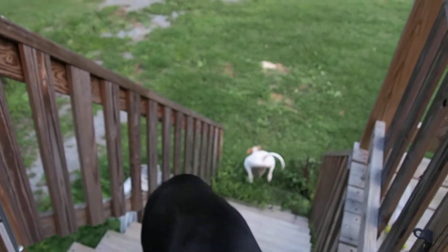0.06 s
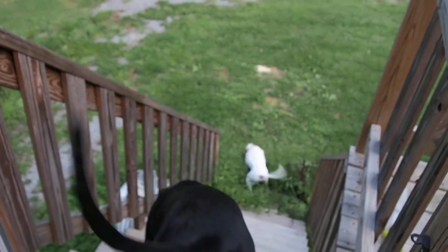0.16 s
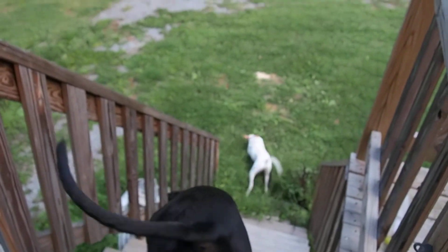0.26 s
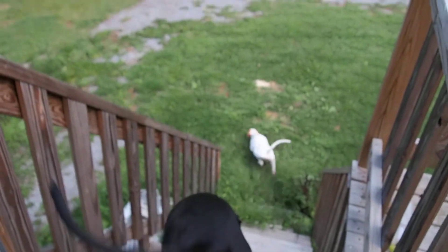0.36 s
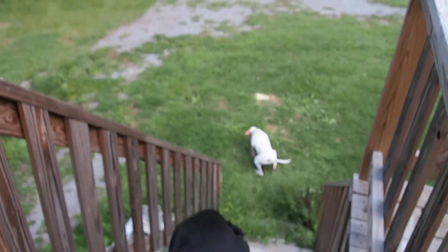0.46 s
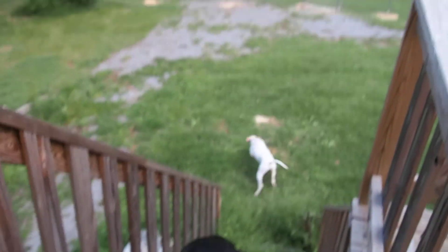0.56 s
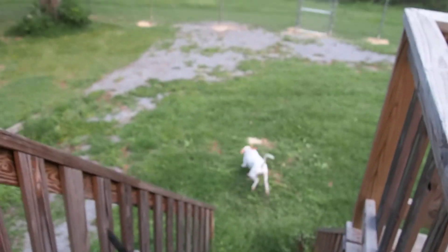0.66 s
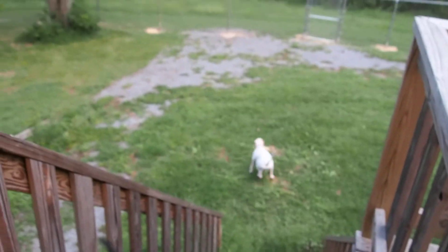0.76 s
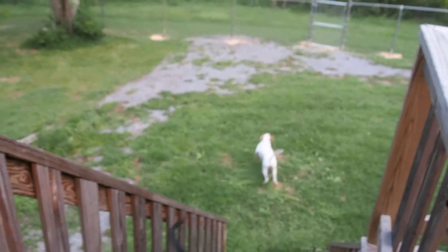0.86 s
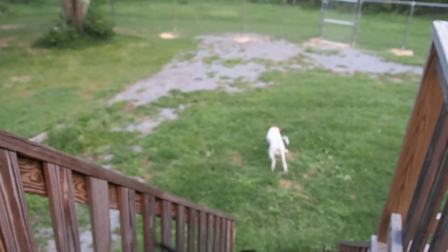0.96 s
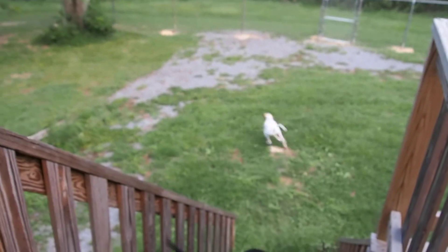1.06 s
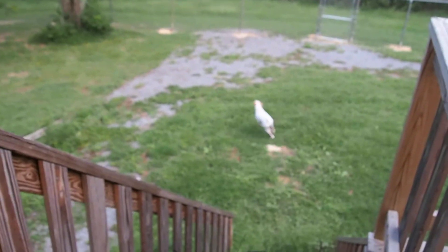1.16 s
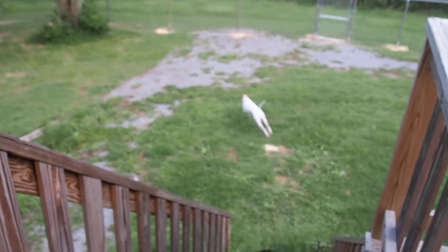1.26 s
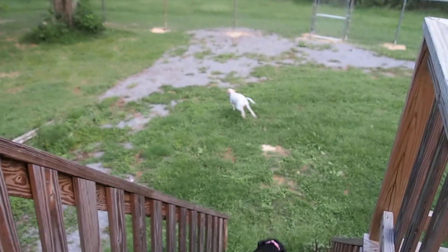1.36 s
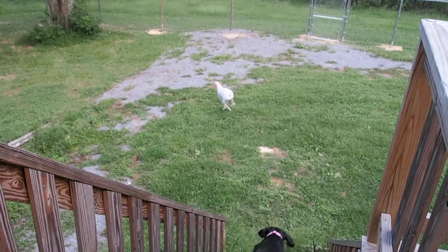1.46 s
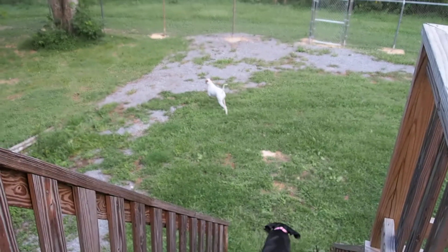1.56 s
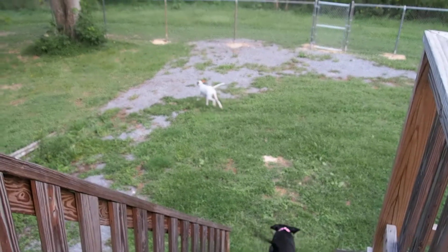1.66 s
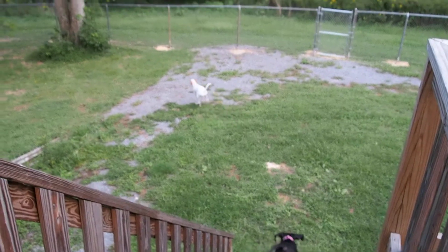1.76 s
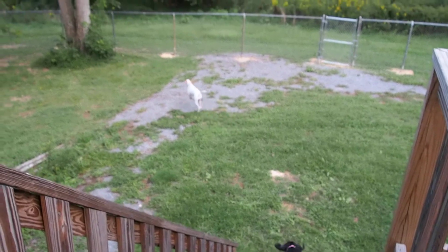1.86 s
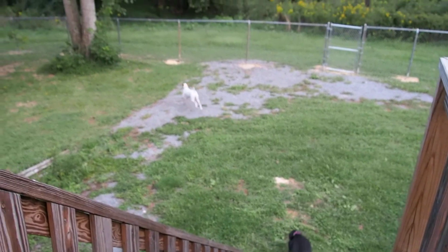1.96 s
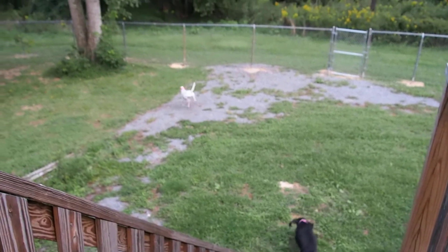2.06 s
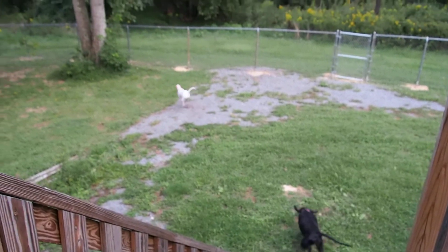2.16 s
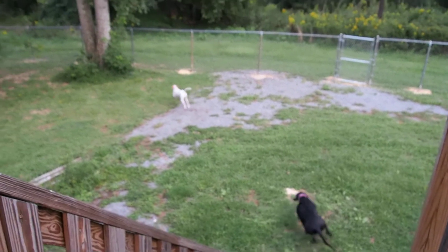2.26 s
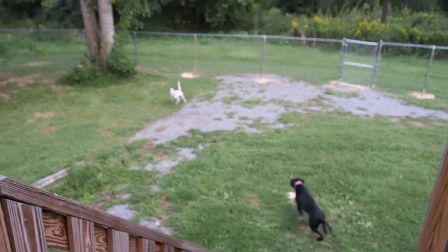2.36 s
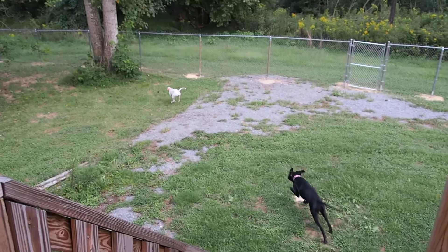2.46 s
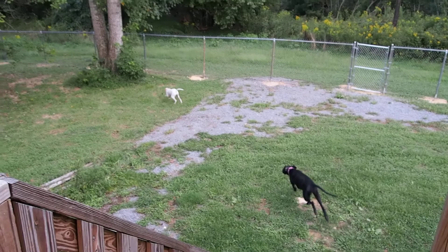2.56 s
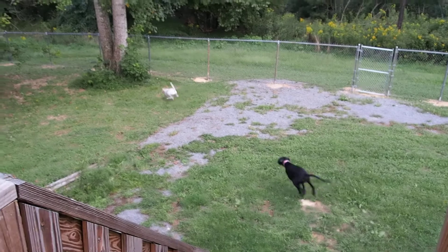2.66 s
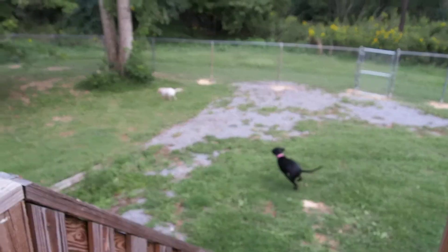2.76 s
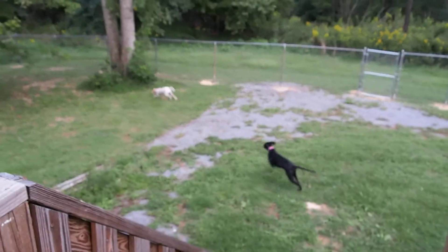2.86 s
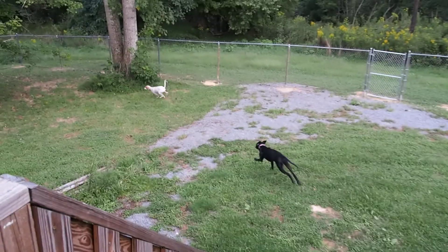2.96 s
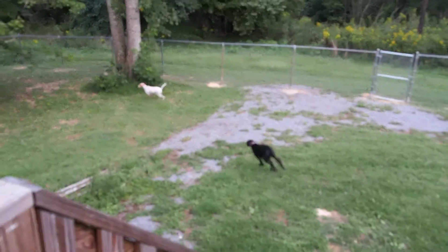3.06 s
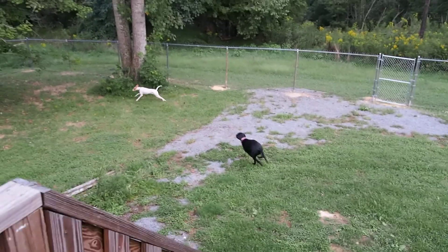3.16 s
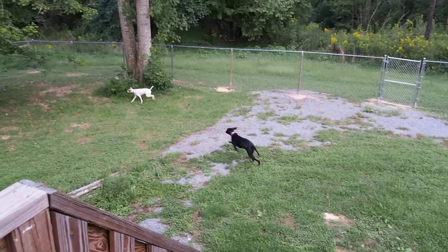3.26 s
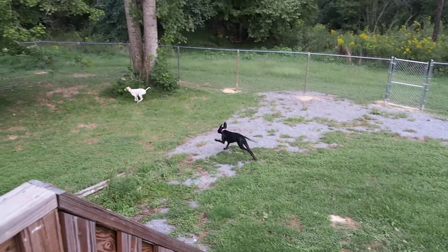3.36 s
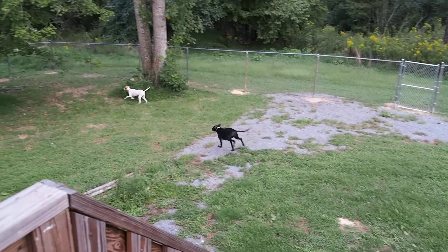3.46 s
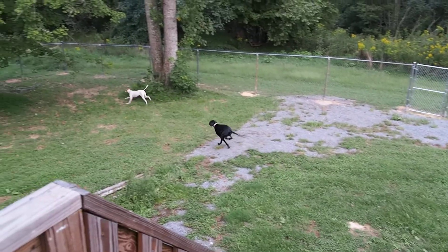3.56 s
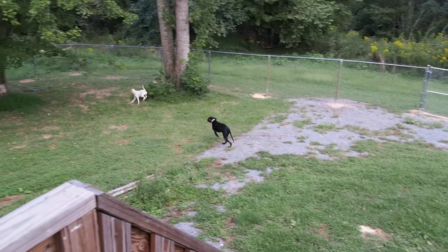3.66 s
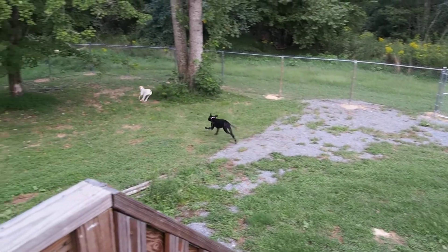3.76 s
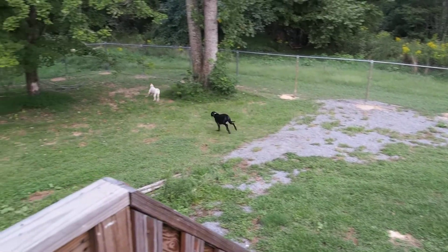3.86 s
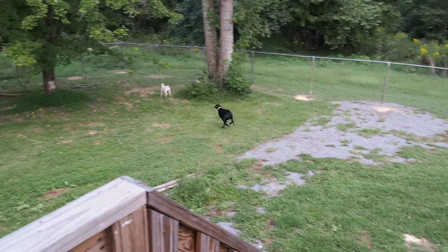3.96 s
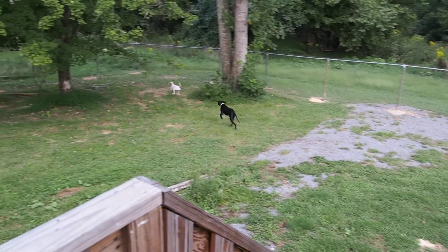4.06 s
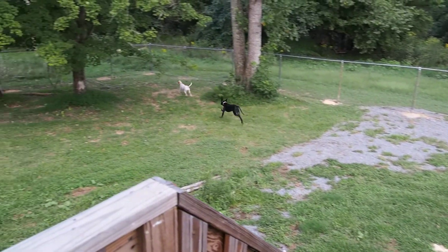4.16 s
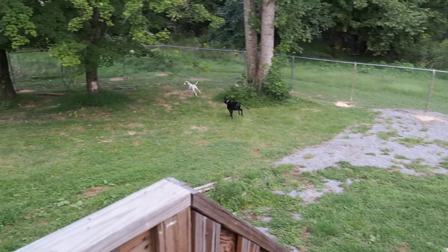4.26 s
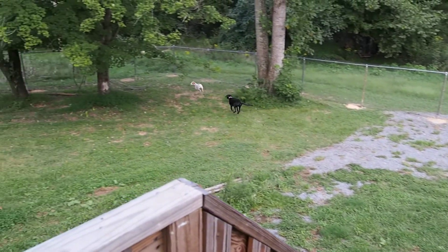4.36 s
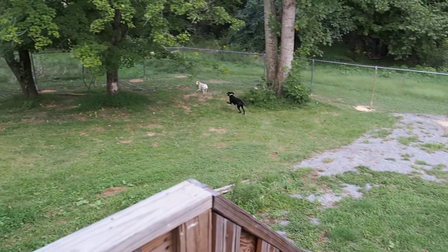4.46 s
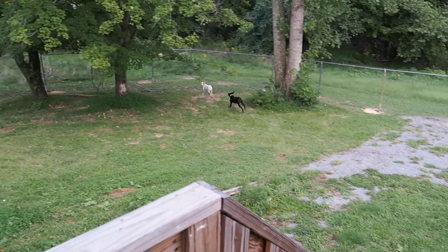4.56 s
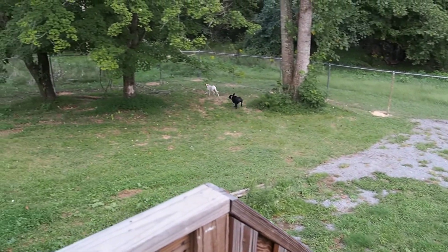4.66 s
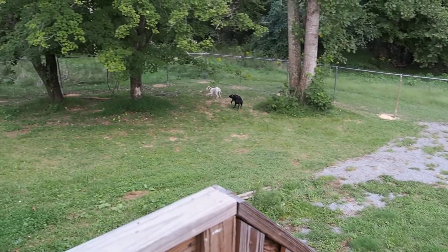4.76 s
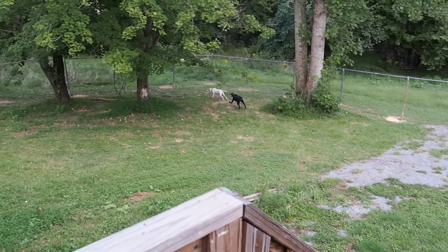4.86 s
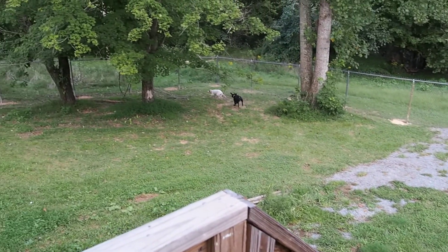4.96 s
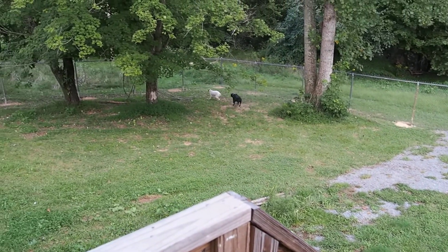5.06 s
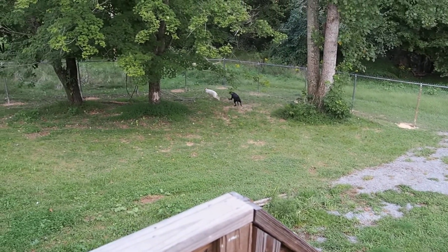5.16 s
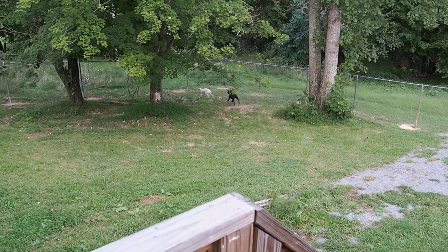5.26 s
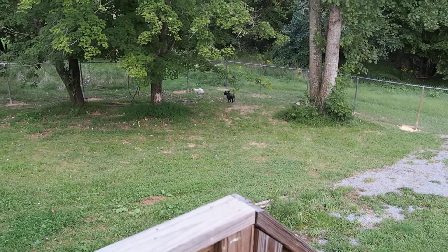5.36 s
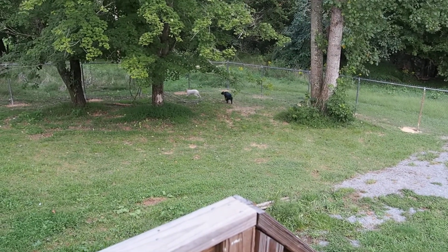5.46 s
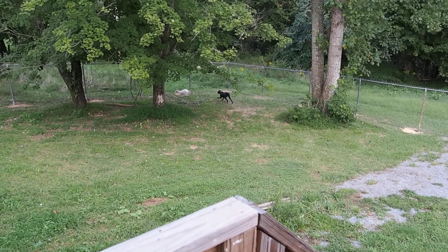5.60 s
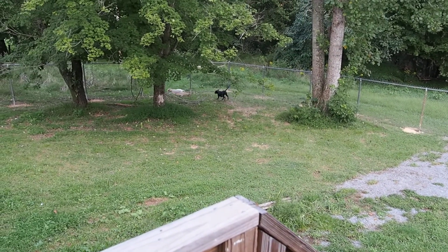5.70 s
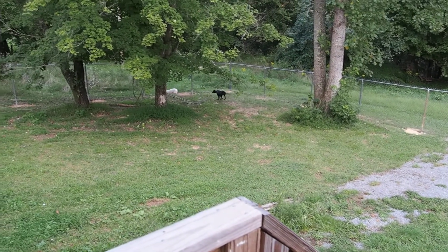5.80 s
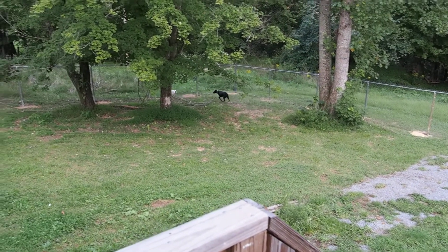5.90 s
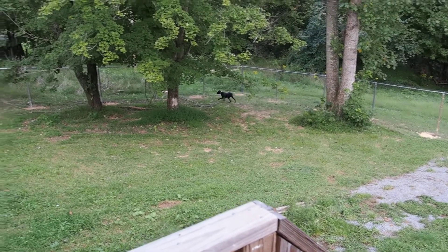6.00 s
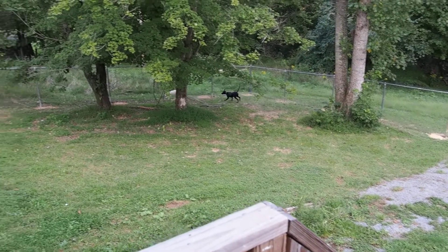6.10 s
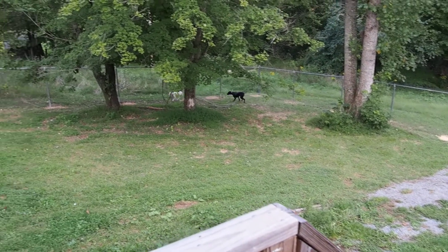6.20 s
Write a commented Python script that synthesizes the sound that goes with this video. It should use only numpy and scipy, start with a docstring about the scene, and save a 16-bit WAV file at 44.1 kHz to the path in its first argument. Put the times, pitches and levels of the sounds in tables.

```python
"""A back yard: a big dog scrambles down wooden deck steps and gallops off over the lawn, growling hoarsely.
Soft pads set the treads ringing and loose boards rumbling; claws snap and scrape on the wood.
Out on the grass the paws swish and thump, and each growl is uneven pulses and breath ringing the throat.
Behind it all, insect wings click into a high drone over a faint hum and the hush of traffic and leaves."""
import sys
import numpy as np
from scipy import signal
from scipy.fft import rfft, irfft
from scipy.io import wavfile
from scipy.ndimage import uniform_filter1d

SR = 44100
rng = np.random.default_rng(int(sys.argv[2]) if len(sys.argv) > 2 else 0)


def inscribe(sig):
    """Save sig as 16-bit PCM at rate SR to the path in sys.argv[1].

    A 1-D sig is mono; a 2-D sig holds one channel per row.
    Samples are clipped to [-1, 1] before scaling.
    """
    pcm = np.round(np.clip(np.atleast_2d(sig).T, -1, 1) * 32767)
    wavfile.write(sys.argv[1], SR, pcm.astype(np.int16))


N = 274902

# pads landing on the steps: (time [s], blow [dB], board pitch [Hz], t60 [s])
PAD_LANDINGS = [(0.0, -10.5, 345, 0.072), (0.009, -15.5, 335, 0.023), (0.033, -26, 330, 0.06),
                (0.078, -19.5, 374, 0.071), (0.1, -9, 350, 0.018), (0.117, -17.5, 329, 0.041),
                (0.249, -25, 249, 0.038), (0.301, -20, 289.4, 0.073), (0.359, -21, 266, 0.056),
                (0.41, -29, 287, 0.066), (0.509, -32.5, 342, 0.17), (0.608, -25, 297, 0.098),
                (0.752, -31, 255, 0.076), (0.855, -12.5, 322, 0.06), (0.899, -21.5, 350, 0.03),
                (0.972, -38, 320, 0.04), (0.985, -26, 303, 0.03), (1.013, -8, 401, 0.043),
                (1.034, -18, 396, 0.023), (1.047, -29, 380, 0.06), (1.072, -19.5, 312, 0.065),
                (1.092, -9, 311, 0.035), (1.115, -14, 275, 0.058), (1.139, -15, 360, 0.016),
                (1.178, -12, 381, 0.039), (1.198, -14.5, 458.5, 0.11), (1.261, -15.5, 400, 0.053),
                (1.298, -24, 516, 0.046), (1.33, -20, 540, 0.0078), (1.38, -27, 416, 0.24),
                (1.405, -17.5, 319.5, 0.074), (1.428, -20, 313, 0.032), (1.53, -23, 431, 0.035),
                (1.543, -20, 474, 0.021), (1.763, -30, 239, 0.059), (1.896, -29.5, 236, 0.011),
                (2.027, -16.5, 539, 0.017), (2.071, -24, 324, 0.014)]
# modes of a board: (pitch [ratio], level [dB], t60 [ratio])
BOARD_MODES = [(1.002, 12, 1.31), (1.347, 3.5, 1.2), (.45, -19, 0.23), (2.3, -3.5, 0.56), (2.9, -5.5, 0.29),
               (4.2, -10, 0.29)]
# modes of the stringers and rails under every tread: (pitch [Hz], level [dB], t60 [s])
FRAME_MODES = [(105.6, -17.5, 0.14), (151, -18.5, 0.08), (207, -8, 0.098), (651, 0, 0.23), (933, 2, 0.15)]
# colour of a brushing paw, before tilt: (frequency [Hz], level [dB])
SWISH_SPECTRUM = [(470, -16.5), (800, 23), (953, 21), (2630, 5.5), (3300, 9.5), (4990, 0.5), (6910, -3.5),
                  (9220, -9), (10800, -24), (16000, -25.5)]


def pad_knocks():
    """A soft pad lands; the ring of tread and frame builds up, then dies in short modes."""
    out, t = np.zeros(N), np.arange(9000) / SR
    rise_s = 0.0085
    attack, decay_time = np.sin(np.pi / 2 * np.minimum(t / rise_s, 1)) ** 2, np.maximum(t - rise_s, 0)
    frame = sum(ping(t, hz, db, t60) for hz, db, t60 in FRAME_MODES[:3])
    # the pad starts the high frame modes less and damps them
    frame += sum(ping(t, hz, db - 9, t60 / 2.16) for hz, db, t60 in FRAME_MODES[3:])
    frame *= np.minimum(t / 0.027, 1)
    for start, db, hz, t60 in PAD_LANDINGS:
        ring = np.zeros(len(t))
        for ratio, mode_db, t60_ratio in BOARD_MODES:
            envelope = attack * amp(mode_db - 60 * decay_time / (t60 * t60_ratio))
            ring += envelope * np.sin(2 * np.pi * (hz * ratio * t + rng.random()))
        add(out, start - .002, amp(db) * (ring / abs(ring).max() + frame))
    return out


def board_rumble():
    """Loose boards rattle: each blow adds energy that builds up and dies away."""
    jolts = rng.standard_normal(N) * amp(1.9 * wobble(rng.standard_normal(N), 500))
    rattle = sum(amp(db) * band(jolts, 300 * ratio, 194) for ratio, db, _ in BOARD_MODES)
    rattle += sum(amp(db + 2.5) * band(jolts, hz, 140) for hz, db, _ in FRAME_MODES)
    power, t = np.zeros(N), np.arange(SR) / SR
    rise_s, t60, blow_share = 0.0031, 0.34, 0.59
    swell = np.minimum(t / rise_s, 1) * amp(-60 * t / t60)
    for start, blow_db, _, _ in PAD_LANDINGS:
        add(power, start, (amp(-30.5 + blow_share * (blow_db + 15.5)) * swell) ** 2)
    return evened(rattle) * np.sqrt(power)


def claws():
    """A nail bites with a snap that rings the spot and the plank, then slides in a gritty scrape."""
    # nails catching wood or gravel: (time [s], level [dB], ring of the spot [Hz], scrape t60 [s])
    catches = [(0.014, -14, 3340, 0.13), (0.046, -19.5, 3850, 0.19), (0.0526, -20, 4250, 0.12),
               (0.08, -34, 3100, 0.043), (0.106, -24.5, 3830, 0.037), (0.117, -21, 2900, 0.046),
               (0.124, -22.5, 3040, 0.06), (0.248, -23.5, 2940, 0.02), (0.3001, -12.5, 4720, 0.038),
               (0.378, -27, 4300, 0.092), (0.508, -19.5, 4460, 0.051), (0.5208, -21, 2280, 0.064),
               (0.567, -27, 3230, 0.05), (0.7994, -24.5, 3100, 0.063), (0.862, -25, 4400, 0.084),
               (0.984, -20, 3470, 0.11), (0.996, -23.5, 1770, 0.097), (1.1197, -14.5, 2460, 0.1),
               (1.123, -15, 3770, 0.026), (1.1855, -19, 4450, 0.033), (1.1856, -16, 5900, 0.034),
               (1.236, -32, 3720, 0.03), (1.246, -33.5, 3870, 0.67), (1.4077, -34, 2660, 0.096),
               (1.5452, -27, 1250, 0.03), (1.763, -29.5, 3970, 0.17), (2.0068, -28.5, 3660, 0.54),
               (2.0274, -27, 4370, 0.064), (2.069, -34.5, 3020, 0.45), (2.15, -43, 3350, 0.02),
               (2.2303, -24, 3500, 0.061), (2.262, -34, 2680, 0.062), (3.971, -33.5, 3300, 0.035),
               (4.855, -30, 3060, 0.011), (5.011, -38, 3100, .012), (5.043, -28.5, 1880, 0.21),
               (5.055, -22, 3820, 0.18)]
    # colour of a bite, before shift and tilt: (frequency [Hz], level [dB])
    bite_spectrum = [(500, -8), (850, -11), (1480, 0), (3200, 4), (5230, -1.5), (8500, -6.5), (11000, -25),
                     (16000, -28)]
    # plank modes a nail excites: (pitch [Hz], level [dB])
    plank_modes = [(980, -9.5), (1465, -9), (1720, -10.5), (2180, -11), (2800, -11), (3270, -5),
                   (4500, -13)]
    out, t = np.zeros(N), np.arange(5000) / SR
    noises = rng.standard_normal((len(catches), 2, len(t)))
    tunings = 1 + 0.0374 * rng.standard_normal((len(catches), len(plank_modes)))
    for (start, db, hz, t60), (grit, grip), tuning in zip(catches, noises, tunings):
        bite = np.sign(grit) * amp(-60 * t / 0.0066)
        bite[0] = 6  # snap of the first contact
        hardness = min(1, (0.053 / t60) ** 0.31)  # a nail that slides long bites less
        scrape = grit * amp(-10.5 + 3.5 * wobble(grip, 50) - 60 * t / t60) * np.minimum(t / .0014, 1)
        drive = hardness * bite + scrape
        spectrum = [(f * (hz / 3300) ** 0.11, level) for f, level in bite_spectrum]
        tilt_db = 2.5 + 0.2 * (db + 20.5) + 0.31 * np.log2(hz / 3000)  # louder or higher is brighter
        spot = amp(10) * band(drive, hz, 820) + hardness * ping(t, hz, db=-4, t60=.014)
        modes = sum(ping(t, f * k, level, t60=0.061) for (f, level), k in zip(plank_modes, tuning))
        plank = amp(-23.5) * signal.oaconvolve(drive, modes)[:len(t)]
        add(out, start, amp(db) * (colour(drive, spectrum, tilt_db) + spot + plank))
    return np.array([out, np.roll(out, 1)])  # reaches the left a hair earlier


def throat(t, pulse_hz, rough, rasp_db):
    """Uneven vocal-fold pulses and puffs of breath ring a half-shut mouth over a low chest buzz."""
    # throat resonances: (centre [Hz], nominal width [Hz], level [dB])
    formants = [(507, 116, 3), (412, 118, -2.5), (263.5, 140, -8), (712, 300, -7.5), (1090, 800, -15.5),
                (2580, 350, -16), (3300, 280, -16.5)]
    wander, breath, uneven, flap, jaw, *spit = rng.standard_normal((12000, 7))[:len(t)].T
    cycles = np.cumsum(pulse_hz * (1 + 0.22 * rough * wobble(wander, 350))) / SR
    pulses = np.diff(np.floor(cycles), prepend=0) * amp(4 * rough * np.clip(uneven, -1, 1))
    puffs = (0.37 + np.exp(-(cycles % 1) / 1.5)) * breath
    lumps = amp(2.4 * rough * wobble(flap, 300, 200))  # soft tissue flaps in the stream
    breath_share = .85 * rough
    drive = lumps * ((1 - breath_share) * evened(pulses) + breath_share * evened(puffs))
    hummed = 0.17 * (1 - rough) ** 4  # a smooth growl is half hummed and sits lower
    shut = 0.1 * np.exp(-t / 0.013)  # the resonances rise as the jaw opens
    mouth = 1 - hummed - shut + rough * 0.07 * wobble(jaw, 900, 900)
    voice = sum((-1) ** k * amp(db) * glide(drive, hz * mouth, 0.86 * width)
                for k, (hz, width, db) in enumerate(formants[:5]))
    for (hz, width, db), noise in zip(formants[5:], spit):  # the rasp comes late and in patches
        rasp = np.minimum(t / 0.08, 1) * amp(db + rasp_db + 4.5 * wobble(noise, 500, 500))
        voice += rasp * glide(drive, hz * mouth ** .5, 0.94 * width)
    chest = amp(-24.5) * evened(resonate(drive, pulse_hz, 68))
    return evened(voice) + chest


def growls():
    """Five bounds push out a short growl each; a landing briefly jolts its level."""
    # growls: (time [s], length [s], effort [dB], drift [dB/s], pulse rate [Hz],
    # landing [s], jolt [dB], rasp [dB])
    bounds = [(2.104, 0.13, -37, 10, 97.6, 2.2, 4.5, -4), (2.322, .19, -31, -2, 105.4, 2.435, -13, -0.5),
              (2.582, 0.19, -26.5, -37, 123, 2.692, -3, -4.5), (2.812, .19, -32.5, 10, 120, 2.86, 0, -1),
              (3.017, 0.21, -30.5, -7, 104.7, 3.165, -9, -2)]
    # hoarseness of each growl: (roughness [0-1])
    roughness = [.08, .65, .6, .75, .75]
    out, rise_s, fall_s, jolt_s = np.zeros(N), 0.016, 0.023, 0.0088
    for (start, length, db, drift, hz, landing, jolt_db, rasp_db), rough in zip(bounds, roughness):
        t = np.arange(0, length, 1 / SR)
        envelope = np.minimum(t / rise_s, 1) * np.minimum((length - t) / fall_s, 1)
        level_db = db + drift * t + jolt_db * np.exp(-((start + t - landing) / jolt_s) ** 2)
        add(out, start, envelope * amp(level_db) * throat(t, hz, rough, rasp_db))
    return out


def paw_swishes():
    """Paws drag over boards or brush grass: a grainy hiss swells and dies, brighter on the lawn."""
    # paw strokes: (time [s], level [dB], t60 [s])
    strokes = [(0.002, -21.5, 0.036), (0.078, -19, 0.11), (0.1566, -34, 0.51), (0.1996, -33, 0.31),
               (0.309, -31.5, 0.56), (0.749, -30.5, 0.1), (1.089, -33, 0.17), (1.726, -33.5, 0.28),
               (1.7633, -30.5, 0.15), (1.852, -28.5, 0.49), (1.9197, -30.5, 0.12), (1.964, -33, 0.36),
               (2.15, -32, 0.26), (2.2095, -34.5, 0.32), (2.512, -41, 0.066), (2.694, -30.5, 0.16),
               (2.74, -34, 0.083), (3.3463, -34, 0.06), (3.4198, -37, 0.096), (3.5707, -31.5, 0.19),
               (3.6375, -32, 0.17), (3.9577, -37.5, 0.13), (4.0856, -40, 0.17), (4.428, -39, 0.079),
               (4.778, -37.5, 0.19), (5.051, -30.5, 0.16), (5.445, -39.5, 0.22), (5.5609, -38, 0.29),
               (6.0495, -39, 0.65)]
    out, t = np.zeros((2, N)), np.arange(14000) / SR
    lawn_s = 1.6  # the paws leave the boards
    for start, db, t60 in strokes:
        grit, side, grain = rng.standard_normal((3, len(t)))
        tilt_db = 6.5 if start < lawn_s else 9 + 0.07 * (start - lawn_s)
        rise_s = 0.073 * t60
        envelope = np.minimum(t / rise_s, 1) ** 2 * amp(-60 * np.maximum(t - rise_s, 0) / t60)
        snaps = amp(2.5 * wobble(grain, 40))
        hiss = [colour(snaps * noise, SWISH_SPECTRUM, tilt_db) for noise in (grit, 0.67 * grit + 0.87 * side)]
        add(out, start - 1.1 * rise_s, amp(db) * envelope * np.array(hiss))
    return out


def turf_thumps():
    """Turf hardly rings: each bound gives a few soft cycles and a short slap."""
    # bounds on the far lawn: (time [s], level [dB], turf pitch [Hz])
    bounds = [(3.741, -38, 119), (4.22, -34.5, 131), (4.426, -36, 148), (4.571, -38, 151),
              (4.615, -31, 133), (4.744, -33.5, 130), (4.911, -40, 138), (4.955, -38, 148)]
    out, t = np.zeros(N), np.arange(5000) / SR
    attack = np.minimum(t / 0.012, 1) ** 2
    for start, db, hz in bounds:
        body = ping(t, hz, db=0, t60=0.16)
        slap = amp(-5 - 60 * t / 0.14) * evened(resonate(rng.standard_normal(len(t)), 370, 120))
        add(out, start - .008, amp(db) * attack * (body + slap))
    return out


def scuffs():
    """Pads and nails skid on the treads with a gritty clatter."""
    # skids between blows: (time [s], length [s], level [dB])
    skids = [(1, 0.3, -40), (1.25, 0.087, -41), (1.375, 0.081, -39)]
    out = np.zeros(N)
    for start, length, db in skids:
        grit, grip = rng.standard_normal((2, 14000))
        envelope = signal.windows.tukey(round(length * SR), .6)
        clatter = evened(band(grit * amp(2.6 * wobble(grip, 150, 150)), hz=850, width=670))
        add(out, start, amp(db) * envelope * clatter[:len(envelope)])
    return out


def echoes(x, t60):
    """Rails, house wall and lawn throw back a thin short tail, different left and right."""
    t = np.arange(6000) / SR
    taps = rng.standard_normal((len(t), 2)).T * (rng.random((len(t), 2)).T < .05)
    taps *= amp(-60 * t / t60) * (t > .002)
    return signal.oaconvolve(x, taps / np.linalg.norm(taps[0]), axes=1)[:, :N]


def grass_rustles():
    """The grass stirs at chance moments, each a faint dying puff of hiss."""
    t = np.arange(4000) / SR
    per_second, t60 = 7.7, 0.097
    onsets = (rng.random(N) < per_second / SR) * amp(-43 + 3.6 * np.minimum(rng.standard_normal(N), 1))
    puff = np.minimum(t / 0.013, 1) ** 2 * amp(-60 * t / t60)
    envelope = signal.oaconvolve(onsets, puff)[:N]
    left, side = rng.standard_normal((N, 2)).T
    return np.array([colour(envelope * x, SWISH_SPECTRUM, 3.34) for x in (left, left + 1.32 * side)])


def insects():
    """Many wings click at random all round, ringing near 7 kHz; five thin ticks come near the end."""
    # wing resonances: (centre [Hz], nominal width [Hz], level [dB])
    wing_modes = [(6874, 575, 8.5), (7120, 640, 1)]
    clicks = rng.choice([-1., 1.], (N, 2)).T * (rng.random((N, 2)).T < .15)
    clicks *= amp(2.54 * rng.exponential(1, (N, 2)).T)
    flutter_db = 0.44 * wobble(rng.standard_normal(N), 600, 600)
    chorus = sum(amp(db) * band(clicks, hz, 1.35 * width) for hz, width, db in wing_modes)
    out = evened(chorus) * amp(-36 + flutter_db)
    stroke = signal.windows.tukey(round(0.012 * SR), .5)
    first_tick_s, gap_s, left_right_db = 5.712, 0.096, [[-42.5], [-48.5]]
    for k, grain in enumerate(rng.standard_normal((5, 2, len(stroke)))):
        rasp = evened(resonate(resonate(grain, 14300, 2500), 13500, 2500))
        add(out, first_tick_s + k * gap_s, amp(left_right_db) * stroke * rasp)
    return out


def yard_hush():
    """Far traffic, leaves and distant insects: a patchy hush, centred in the bass and wide on top."""
    # colour of the hush: (frequency [Hz], level [dB])
    spectrum = [(25, -12.5), (117, -6.5), (166, -9), (405, -8.5), (531, -12), (988, -11), (1330, -17),
                (3080, -9.5), (4870, -12.5), (5880, -10.5), (6920, -1.5), (11000, -29), (14000, -21.5),
                (16000, -24)]
    # stereo image: (frequency [Hz], left-right likeness [correlation])
    image = [(130, 0.93), (290, 0.85), (640, 0.95), (1410, 0.53), (3100, 0.27), (6820, 0.047),
             (15000, -0.14)]
    frames, hz = N // 256 + 5, np.fft.rfftfreq(1024, 1 / SR)
    noise = rng.standard_normal((frames, len(hz), 4)).T
    left, side = noise[0::2] + 1j * noise[1::2]
    likeness = read(image, hz)[:, None]
    right = likeness * left + np.sqrt(1 - likeness ** 2) * side
    patches = uniform_filter1d(rng.standard_normal((frames, len(hz))).T, 12, axis=0)
    gain = amp(read(spectrum, hz)[:, None] + 2.15 * wobble(patches, 14))
    hush = signal.istft(np.array([left, right]) * gain, nperseg=1024, noverlap=768)[1][:, :N]
    return amp(-39.5) * evened(hush)


def far_hum():
    """A faint far hum: noise in one narrow resonance swells, wavers and fades."""
    peak_s, spread_s = 4.12, 0.73
    swell = np.exp(-((np.arange(N) / SR - peak_s) / spread_s) ** 2)
    level_db = -55.5 - wobble(rng.standard_normal(N), 2000, 2000)
    return swell * amp(level_db) * evened(band(rng.standard_normal(N), hz=1513, width=190))


def amp(db):
    """Decibels to gain."""
    return 10 ** (np.asarray(db) / 20)


def evened(x):
    """Scales to rms 1."""
    return x / np.sqrt(np.mean(x ** 2) + 1e-20)


def wobble(noise, *spans):
    """Smooths noise into a drift of rms 1, one moving average per span."""
    for span in spans:
        noise = uniform_filter1d(noise, span)
    return evened(noise)


def read(points, hz):
    """A spectrum table read on a log-frequency axis."""
    f, value = np.transpose(points)
    return np.interp(np.log(hz + 1), np.log(f + 1), value)


def add(mix, start, sound):
    """Lays a sound into the mix at start seconds."""
    part = mix[..., max(round(start * SR), 0):][..., :sound.shape[-1]]
    part += sound[..., :part.shape[-1]]


def ping(t, hz, db, t60):
    """One struck mode: a dying sine."""
    return amp(db - 60 * t / t60) * np.sin(2 * np.pi * hz * t)


def resonate(x, hz, width):
    """A one-pole resonance of gain 1, width in Hz."""
    r = np.exp(-np.pi * width / SR)
    return 2 * signal.lfilter([1 - r], [1, -r * np.exp(2j * np.pi * hz / SR)], x.astype(complex)).real


def band(x, hz, width):
    """The same resonance twice, for steeper skirts."""
    return resonate(resonate(x, hz, width), hz, width)


def glide(x, hz, width):
    """A resonance that follows the curve hz: shift down to zero, smooth twice, shift back."""
    turn, r = np.exp(2j * np.pi * np.cumsum(hz) / SR), np.exp(-np.pi * width / SR)
    return 2 * (turn * signal.lfilter([(1 - r) ** 2], [1, -2 * r, r * r], x / turn)).real


def colour(x, table, tilt_db):
    """Causal EQ in the shape of a spectrum table, tilted in dB per octave about 4 kHz."""
    hz = abs(np.fft.fftfreq(1024, 1 / SR))
    gain_db = np.maximum(read(table, hz) + tilt_db * np.log2((hz + 50) / 4000), -80)
    minimum_phase = np.exp(np.conj(signal.hilbert(np.log(amp(gain_db)))))
    taps = np.fft.ifft(minimum_phase).real[:512]
    return signal.oaconvolve(x, taps / np.linalg.norm(taps))[:len(x)]


def scene():
    """The dog near the centre with short echoes, the yard spread wide around it."""
    voice = growls() * amp([[.8], [-.8]])
    steps = (pad_knocks() + board_rumble()) * amp([[.2], [-.2]])
    body = voice + steps + turf_thumps() + far_hum() + scuffs()
    nails = claws()
    tails = amp(-37) * echoes(body, t60=0.99) + amp(-5.5) * echoes(nails, t60=0.044)
    return body + nails + tails + paw_swishes() + grass_rustles() + yard_hush() + insects()


def record(dry):
    """Tints left and right a little differently, then trims the deep bass and the very top."""
    # stereo tint: (frequency [Hz], left minus right [dB])
    balance = [(60, 1.5), (180, -0.5), (550, 1.55), (1650, -0.5), (4970, -0.5), (15000, 4)]
    low_cut_hz, high_cut_hz = 60, 15870
    hz = np.fft.rfftfreq(N, 1 / SR)
    tinted = irfft(rfft(dry) * amp(np.outer([.5, -.5], read(balance, hz))), N)
    trimmed = signal.sosfilt(signal.butter(2, low_cut_hz, "high", fs=SR, output="sos"), tinted)
    lowpass = signal.firwin(511, high_cut_hz, window=("kaiser", 9), fs=SR)
    return signal.oaconvolve(trimmed, lowpass[None], "same")


dry = scene()
out = record(dry)
inscribe(out)
```